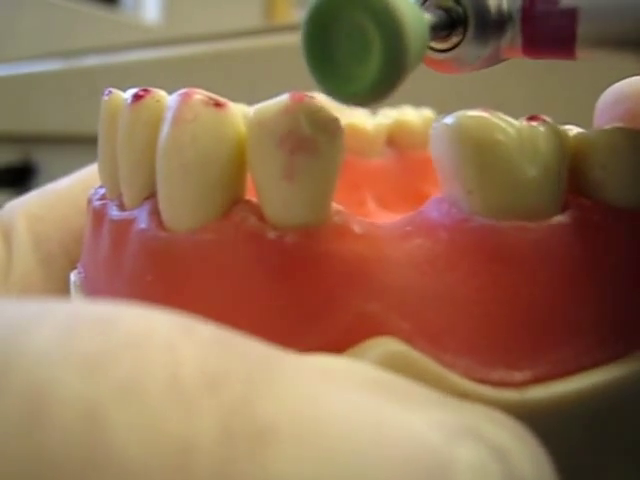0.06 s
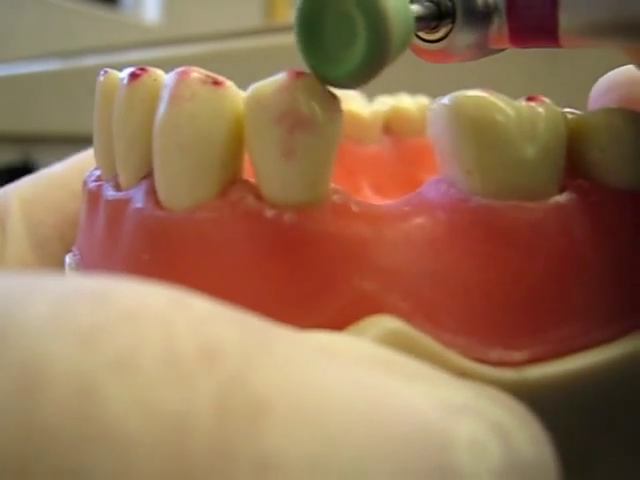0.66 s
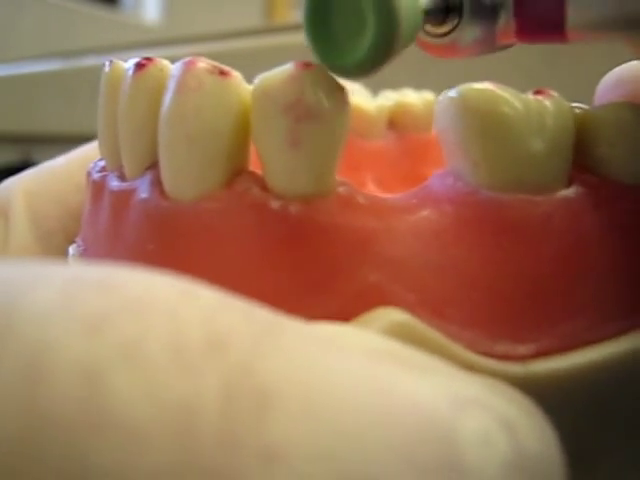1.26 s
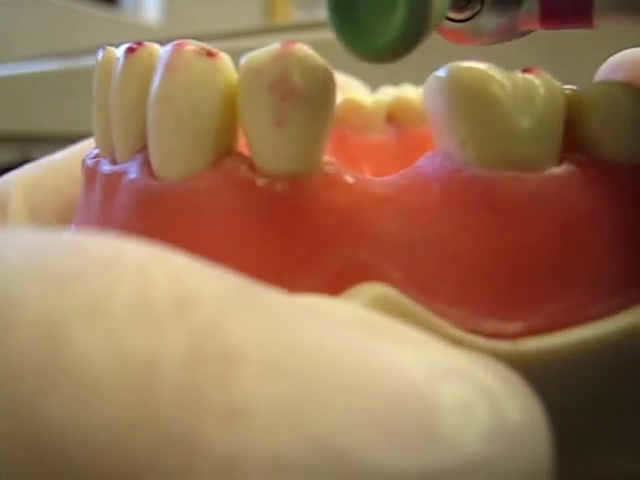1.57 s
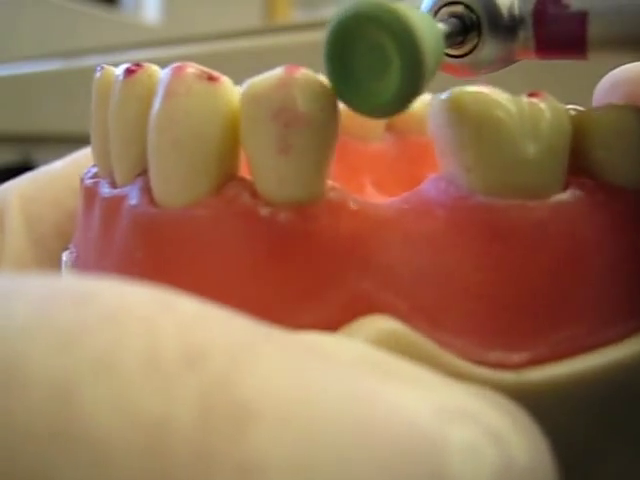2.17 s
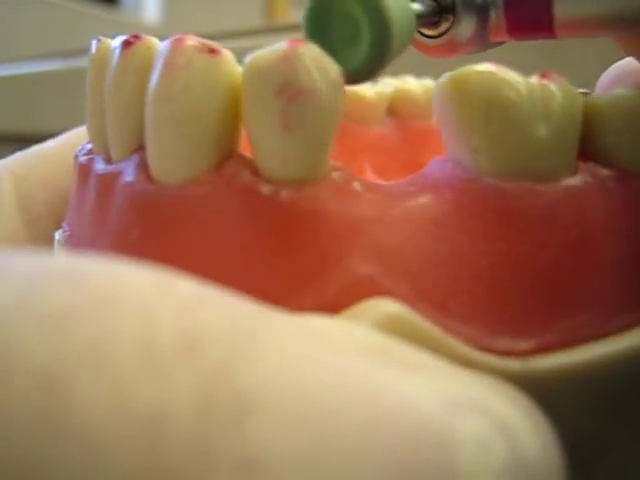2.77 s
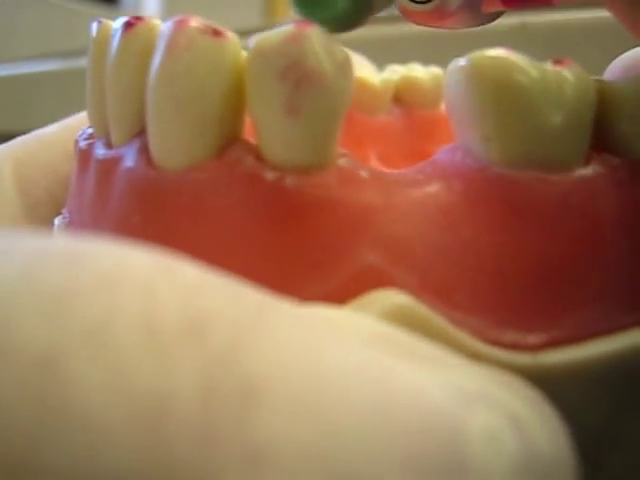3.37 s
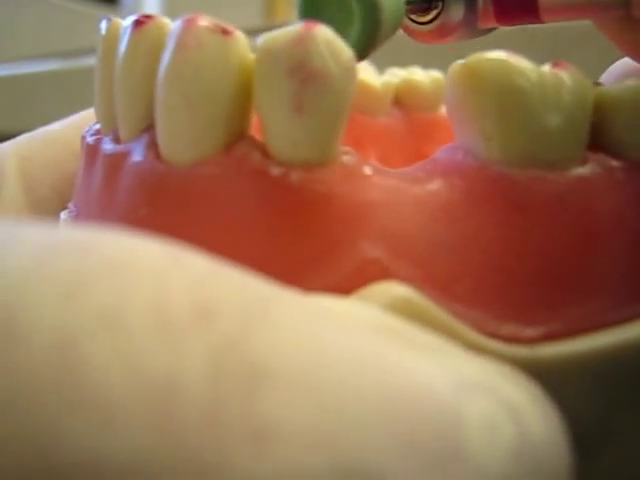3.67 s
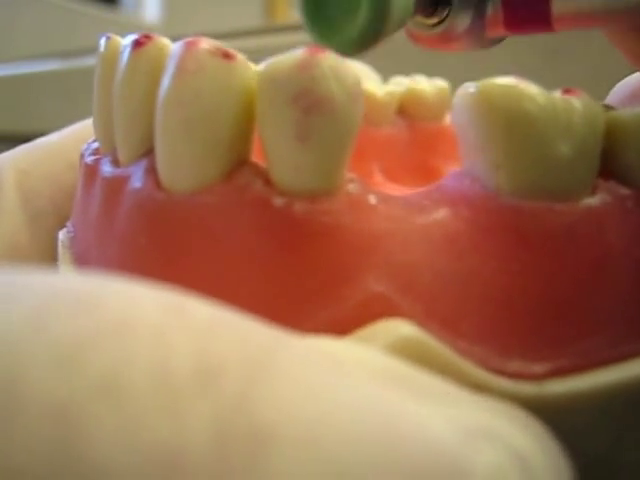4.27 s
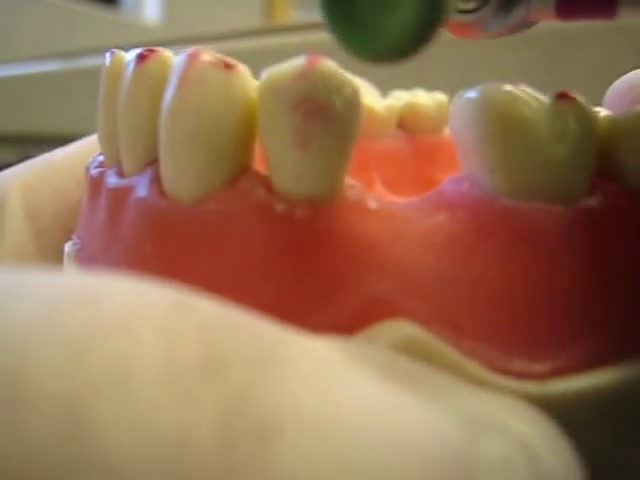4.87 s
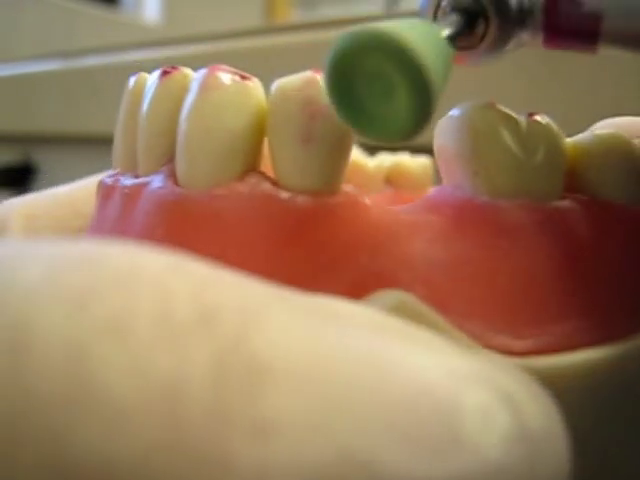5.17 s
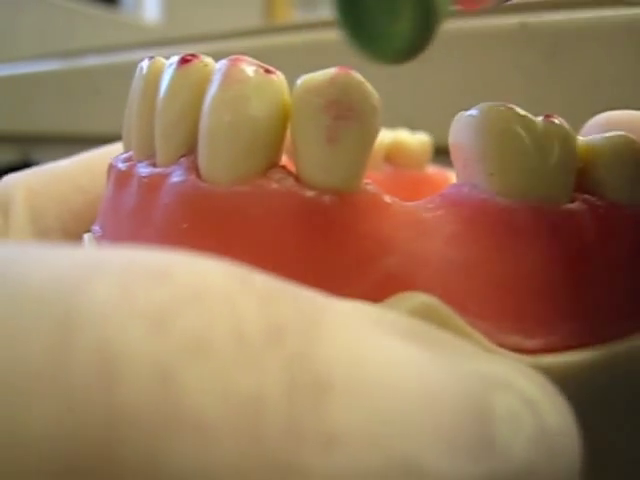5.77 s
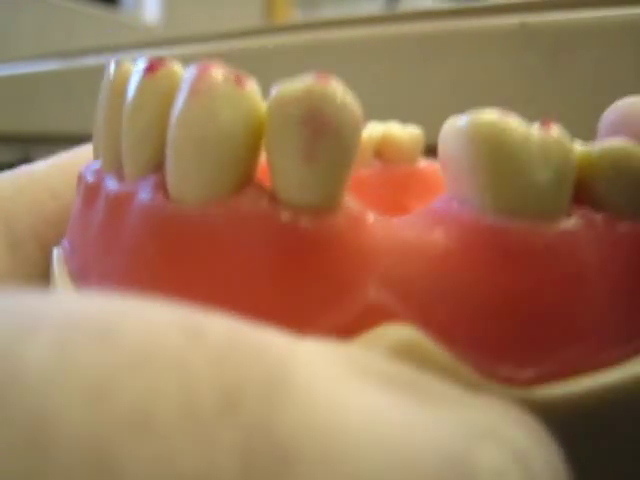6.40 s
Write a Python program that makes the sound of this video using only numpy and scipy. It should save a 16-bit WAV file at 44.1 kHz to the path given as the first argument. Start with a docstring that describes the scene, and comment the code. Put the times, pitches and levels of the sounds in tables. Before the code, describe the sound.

A dental handpiece runs close to the microphone for the whole six and a half seconds, with a high, many-toned whine, a fine bearing fizz and the rush and hiss of exhaust air. From the start until about 4.3 seconds, its rubber polishing wheel is dabbed on a model tooth a dozen times, roughly every 0.3 to 0.5 seconds. Each touch lasts about a tenth of a second and gives a high squeal with a little gritty rubbing, the pitch sagging and recovering as the motor is braked. Whine and air dip at firmer touches and slowly swell back. From 4.3 to 5.6 seconds the tool runs free. Soft gusts of exhaust buffet the microphone around 3.3, 4.2, 4.9 and 6.4 seconds. Two last light touches, near 5.6 and 6 seconds, sound rougher and buzzier as the wheel bounces. The whine continues to the end.

```python
"""A dental handpiece whines close to the microphone at about 18,500 rpm, blowing exhaust air.
Its rubber polishing wheel is dabbed on a model tooth: each touch drags the speed down and makes the
drive squeal; on the last, light touches the wheel bounces once a turn and buzzes. The bed of whine,
bearing fizz and air dips at firm touches and swells slowly back, with a few gusts of exhaust.
A small camera samples the sound coarsely, folding the top end down."""
import sys
import numpy as np
from scipy import signal
from scipy.fft import rfft, irfft, next_fast_len
from scipy.io import wavfile
from scipy.ndimage import uniform_filter1d

SR = 44100
rng = np.random.default_rng(int(sys.argv[2]) if len(sys.argv) > 2 else 0)


def store_pcm(level_fs):
    """Save levels as 16-bit WAV."""
    pcm = np.round(np.clip(level_fs, -1, 1) * 32767).astype(np.int16)
    wavfile.write(sys.argv[1], SR, np.atleast_2d(pcm).T)


N = 288414
TIME = np.arange(N) / SR

# the free-running motor settles as it warms: t/s, speed/(turns per s)
FREE_SPEED = [(0, 310.7), (2.1, 309.1), (3.45, 307.15), (6.54, 307.1)]
# whine of the drive: multiple of the motor speed, level/dB
WHINE_PARTIALS = [(8, -20), (11, -6.5), (12, -6.5), (13, -19.5), (14, -16), (15, 1.5), (16, -7), (17, -4.5),
                  (18, -4), (19, -4.5), (20, 1.5), (21, -4.5), (22, -9), (23, -9.5), (25, -8)]
# tone colour of the bearings: f/Hz, level/dB
FIZZ_EQ = [(2400, -24), (3100, -0.5), (3500, -3), (4100, -5), (4600, -2.5), (5000, 2.5), (5450, 0.5),
           (5800, -53.5)]
# how hard the free-running motor excites the housing: t/s, level/dB
RING_DRIVE = [(0, -46.5), (2.85, -48.3), (3.4, -44.7), (4.7, -44.2), (5.55, -46.3), (5.8, -52.5),
              (6.24, -53.5), (6.42, -46)]
# narrow resonances of the housing: f/Hz, width/Hz, gain/dB
HOUSING_MODES = [(3035.7, 47, 0.5), (2917, 56, -0.5)]
# the air's low buffeting, mid rush and high hiss, each: f/Hz, level/dB
BUFFET_EQ = [(10, -4), (25, -2), (45, -1.5), (80, -0.5), (140, -3), (190, -19.5), (400, -52.5)]
RUSH_EQ = [(90, -22), (140, 0), (260, 0.5), (450, -3.5), (620, -5), (820, -6.5), (1000, -10), (1300, -14.5),
           (1800, -21.5), (3000, -43.5)]
HISS_EQ = [(800, -16.5), (1450, -0.5), (1750, -3.5), (2100, 1.2), (2600, -0.5), (3200, 1.5), (3700, -1.5),
           (4200, -1.5), (5400, -7), (5800, -49.5)]
# hollows that the air stream sets humming: f/Hz, width/Hz, gain/dB
HOLLOW_MODES = [(258, 5.7, 2.5), (362, 20, -3), (467.6, 23, -8)]
# wheel on tooth: start t/s, slowest t/s, recovered t/s, speed lost/(turns per s), base level/dB,
# dip of the bed/dB, bounce (over 1 the wheel lifts off every turn)
TOUCHES = [(-0.064, -0.01, 0.054, 13.5, -36.8, 0, 0.6), (0.272, 0.329, 0.39, 13.7, -35.4, 0, 0.7),
           (0.73, 0.803, 0.875, 12, -33.3, .8, 0.6), (1.033, 1.121, 1.187, 21.3, -32.9, 1.8, 0.4),
           (1.357, 1.418, 1.473, 19.9, -33, 1, 0.41), (1.839, 1.939, 2.035, 26, -33, 2.4, 0.5),
           (2.23, 2.285, 2.36, 19.9, -34, .3, 0.42), (2.747, 2.805, 2.878, 14.7, -33, 0, 0.46),
           (3.111, 3.164, 3.225, 12.8, -33, .3, 0.6), (3.573, 3.619, 3.675, 9.3, -32.3, 0, 0.8),
           (3.941, 3.997, 4.055, 6.2, -33.8, .7, 1.1), (4.207, 4.297, 4.338, 14, -31.6, 3, 0.45),
           (5.59, 5.672, 5.745, 7.7, -32, 4.6, 2.5), (5.986, 6.043, 6.11, 9.1, -31.8, 3.8, 3.3)]
# squeal of the loaded drive: multiple of the motor speed, level/dB
SQUEAL_PARTIALS = [(9, -29.5), (11, -17), (12, 0.5), (13, -18), (17, -33), (20, -32.5)]
# broad resonances of wheel and tooth: f/Hz, width/Hz, gain/dB
TOOTH_MODES = [(2220, 380, -9.5), (3090, 400, -3), (3290, 420, -3), (4800, 900, -6.5)]
# the exhaust jet sweeps across the microphone: start t/s, peak t/s, end t/s, buffeting boost/dB
GUSTS = [(2.5, 3.3, 3.65, 1.7), (4.02, 4.18, 4.3, 3), (4.72, 4.88, 5.4, 4.8), (6.15, 6.45, 6.8, 2.8)]
# the camera's output smoothing: f/Hz, gain/dB
SMOOTHING_EQ = [(3500, 0), (4600, -1.9), (5200, -3.5), (5800, -8), (6420, -14.5), (6760, -20.5),
                (7070, -25), (7600, -40), (8000, -65), (9500, -81.5), (11200, -61), (12500, -46),
                (13600, -45.5), (14400, -61.5)]

# the bed: each layer's base level, and how strongly it rides the swell
WHINE_DB, WHINE_RIDE = -50.5, 1.15
FIZZ_DB, FIZZ_RIDE = -46.2, 1.02
BUFFET_DB, BUFFET_RIDE = -41, .65
RUSH_DB, RUSH_RIDE = -39.65, .92
HISS_DB, HISS_RIDE = -46.2, .8


def from_db(db):
    """Decibels to gain."""
    return 10 ** (np.asarray(db) / 20)


def rms_one(x):
    """Scale to an rms of 1."""
    return x / np.sqrt(np.mean(x ** 2) + 1e-20)


def automation(points):
    """A (time, value) curve at every sample."""
    return np.interp(TIME, *np.transpose(points))


def equalise(x, points):
    """Filter by an EQ curve of (Hz, dB) points."""
    hz, db = np.transpose(points)
    size = next_fast_len(N)
    bin_hz = np.maximum(np.arange(size // 2 + 1) * SR / size, 1)
    gain = from_db(np.interp(np.log(bin_hz), np.log(hz), db))
    return irfft(rfft(x, size) * gain, size)[:N]


def noise(points):
    """Coloured noise of rms 1."""
    return rms_one(equalise(rng.standard_normal(N), points))


def drift(rate_hz):
    """A smooth random modulator of rms 1, rolling off above rate_hz."""
    step, run_in = 20, 4000
    pole = np.exp(-2 * np.pi * step * rate_hz / SR)
    white = rng.standard_normal(N // step + run_in + 2)
    slow = signal.lfilter([1], [1, -2 * pole, pole * pole], white)[run_in:]
    return np.interp(np.arange(N) / step, np.arange(len(slow)), rms_one(slow))


def resonate(x, modes):
    """Parallel resonators, each peaking at its given gain."""
    out = 0
    for hz, width, db in modes:
        r = np.exp(-np.pi * width / SR)
        b = (1 - r * r) / 2 * np.array([1, 0, -1])
        a = [1, -2 * r * np.cos(2 * np.pi * hz / SR), r * r]
        out = out + from_db(db) * signal.lfilter(b, a, x + 1e-18)
    return out


def tone(angle):
    """A sine of rms 1."""
    return np.sqrt(2) * np.sin(angle)


def arch(start, top, end):
    """A rounded envelope from 0 to 1 and back."""
    return np.sin(np.interp(TIME, [start, top, end], [0, np.pi / 2, np.pi])).clip(0, 1)


def whine(angle, waver_db=1.3):
    """Harmonics of the motor speed, out of phase with each other, each wavering a little in level."""
    phases = rng.uniform(0, 2 * np.pi, len(WHINE_PARTIALS))
    return sum(from_db(db + waver_db * drift(8.3)) * tone(k * angle + phase)
               for (k, db), phase in zip(WHINE_PARTIALS, phases))


def housing_ring(angle, press, sag, load_db=-45.5, sputter_db=2.5):
    """The tenth harmonic chirps as it sweeps through the housing's resonances, sputtering under load."""
    free = from_db(automation(RING_DRIVE))
    loaded = np.tanh(sag) * from_db(load_db + sputter_db * press * drift(40))
    return resonate((free + loaded) * tone(10 * angle), HOUSING_MODES)


def bearings(angle, throb=.3, rattle_db=1.0):
    """A fine, fizzy rattle that throbs once per motor turn."""
    return rms_one(noise(FIZZ_EQ) * (1 + throb * np.cos(angle)) * from_db(rattle_db * drift(370)))


def handpiece(angle, swell_db, press, sag, whine_load_db=-3.0, fizz_load_db=3.6):
    """The running tool: load ducks the whine and stirs up housing and bearings."""
    drive = from_db(WHINE_DB + WHINE_RIDE * swell_db + whine_load_db * press) * whine(angle)
    ring = housing_ring(angle, press, sag)
    fizz = from_db(FIZZ_DB + FIZZ_RIDE * swell_db + fizz_load_db * press) * bearings(angle)
    return drive + ring + fizz


def exhaust(swell_db, hum_db=-12.5, lumpy_db=.6, rush_gust_share=.46, hiss_gust_share=.24):
    """Air buffets the microphone, rushes past, hisses and hums in the hollows of model and hand."""
    gust_db = sum(db * arch(start, peak, end) for start, peak, end, db in GUSTS)
    buffet_gain = from_db(BUFFET_DB + BUFFET_RIDE * swell_db + gust_db + lumpy_db * drift(5))
    rush_gain = from_db(RUSH_DB + RUSH_RIDE * swell_db + rush_gust_share * gust_db)
    hiss_gain = from_db(HISS_DB + HISS_RIDE * swell_db + hiss_gust_share * gust_db)
    hum = from_db(hum_db) * rms_one(resonate(rng.standard_normal(N), HOLLOW_MODES))
    buffet = buffet_gain * noise(BUFFET_EQ)
    rush = rush_gain * (noise(RUSH_EQ) + hum)
    return buffet + rush + hiss_gain * noise(HISS_EQ)


def dabs(recovery_s=.022, landing_share=.38, start_db=-2, swell_db_per_s=2.8):
    """Each touch's pressure, speed sag, level and bounce; the bed's level dips at firm touches and swells
    slowly back."""
    press, sag = np.zeros(N), np.zeros(N)
    swell_db = start_db + swell_db_per_s * TIME
    for start, slowest, recovered, speed_lost, _, dip_db, _ in TOUCHES:
        lifted = recovered - recovery_s   # the motor is still picking up when the wheel has left
        firmest = start + landing_share * (lifted - start)   # the wheel lands faster than it leaves
        press += arch(start, firmest, lifted) ** .55
        sag += speed_lost * arch(start, slowest, recovered) ** 1.55
        swell_db -= np.interp(TIME, [start, slowest], [0, dip_db])
    starts, *_, touch_db, _, bounce = np.transpose(TOUCHES)
    current = np.maximum(np.searchsorted(starts, TIME) - 1, 0)
    return press, sag, swell_db, touch_db[current], bounce[current]


def contact(press, bounce, angle, wheel_ratio=.41, mean_lift=.41, shake=.15, uneven=.07, grip=2.28):
    """The wheel runs out of true: light pressure touches once a turn, firm pressure all the way round."""
    lift = mean_lift + .5 * np.cos(wheel_ratio * angle) + shake * np.cos(angle) + uneven * drift(250)
    force = np.maximum(press - bounce * np.maximum(lift, 0), 0)
    return np.tanh(grip * force)


def rubbing(touching, grain_db=5.5):
    """Abrasive grains scrape the tooth while the wheel is down."""
    grains = rng.standard_normal(N) * from_db(grain_db * drift(600))
    return resonate(grains * touching, TOOTH_MODES) / np.std(resonate(grains, TOOTH_MODES))


def squeal(angle, touching, ring_s=.00073, jitter_rad=.13, rasp_rad=.49, rough=.08):
    """Under load the drive sings, mostly at twelve times its speed, roughened by the rubber's slip."""
    pole = np.exp(-1 / (ring_s * SR))
    envelope = signal.lfilter([1 - pole], [1, -pole], touching)   # builds and dies with each bounce
    airborne = 1 - uniform_filter1d(touching, size=SR // 100)   # share of time off the tooth
    slip = (jitter_rad + rasp_rad * airborne ** 2) * drift(200)   # a bouncing wheel catches out of step
    tones = sum(from_db(db) * tone(k * angle + slip) for k, db in SQUEAL_PARTIALS)
    return envelope * (1 + rough * drift(300)) * tones


def scene(flutter_hz=.1795, rub_db=-7.1, rub_bounce_db=2.3, squeal_db=-3.0, squeal_press_db=4.0):
    """One motor drives every tone; touches brake it, adding rub and a squeal that grows with pressure."""
    press, sag, swell_db, touch_db, bounce = dabs()
    motor_hz = automation(FREE_SPEED) - sag + flutter_hz * drift(40)
    angle = 2 * np.pi * np.cumsum(motor_hz) / SR
    touching = contact(press, bounce, angle)
    rub = from_db(rub_db + rub_bounce_db * bounce) * rubbing(touching)   # a bouncing wheel lands harder
    sing = from_db(squeal_db + squeal_press_db * press ** 2) * squeal(angle, touching)
    polishing = from_db(touch_db) * (sing + rub)
    return (handpiece(angle, swell_db, press, sag) + polishing + exhaust(swell_db))[None]


def record(dry, cutoff_hz=14400):
    """Quarter-rate sampling folds the high harmonics down and mirrors the treble about 5.5 kHz."""
    sampled = 4 * dry[0] * (np.arange(N) % 4 == 0)
    top_cut = signal.ellip(10, .1, 80, cutoff_hz, fs=SR, output="sos")
    return signal.sosfilt(top_cut, equalise(sampled, SMOOTHING_EQ))[None]


dry = scene()
out = record(dry)
store_pcm(out)
```